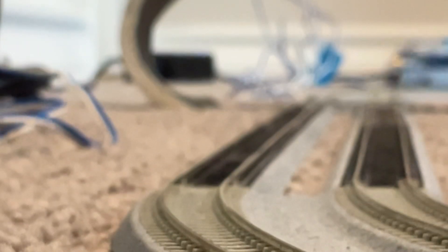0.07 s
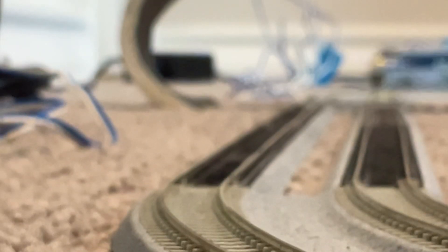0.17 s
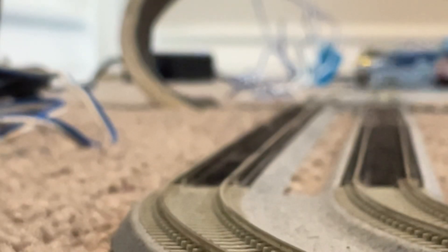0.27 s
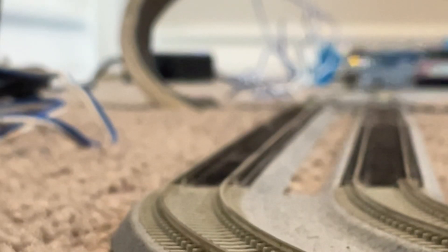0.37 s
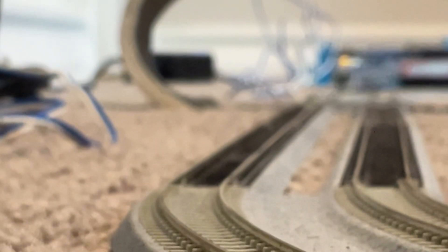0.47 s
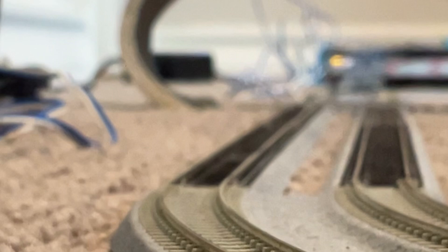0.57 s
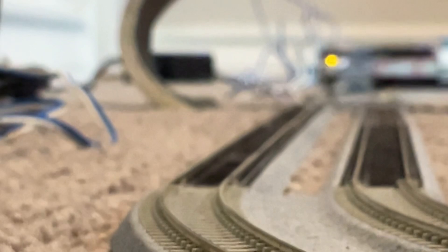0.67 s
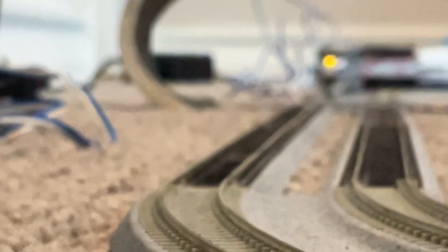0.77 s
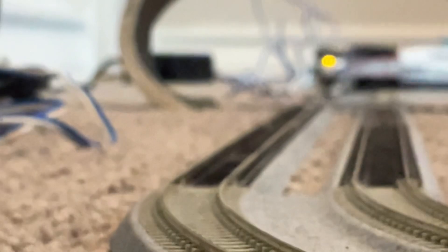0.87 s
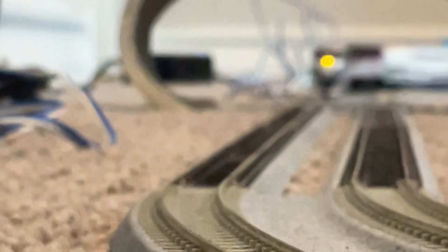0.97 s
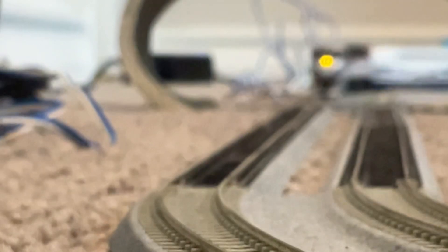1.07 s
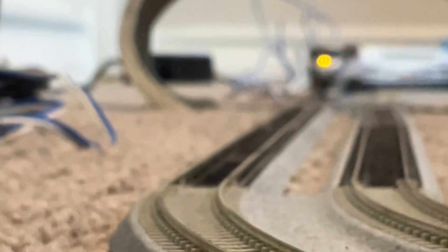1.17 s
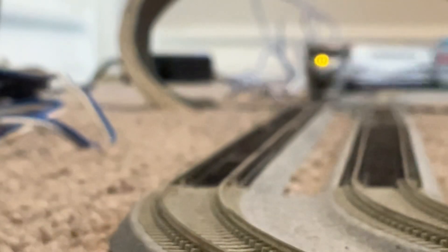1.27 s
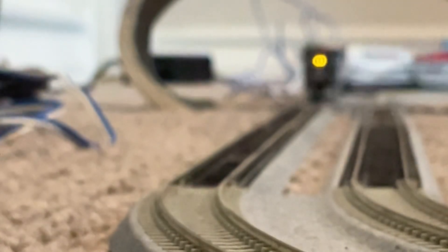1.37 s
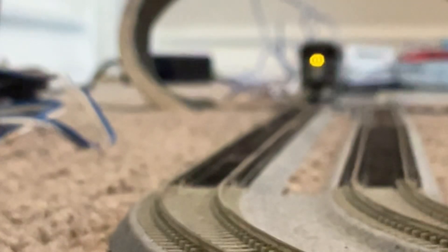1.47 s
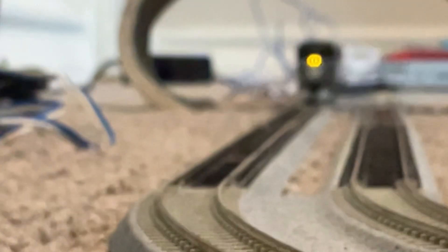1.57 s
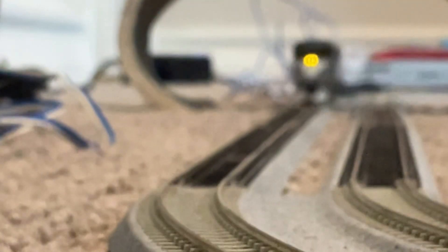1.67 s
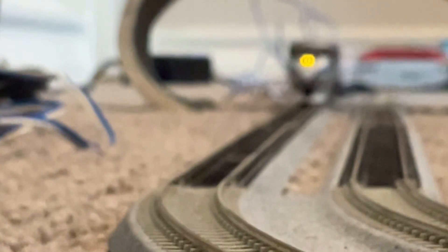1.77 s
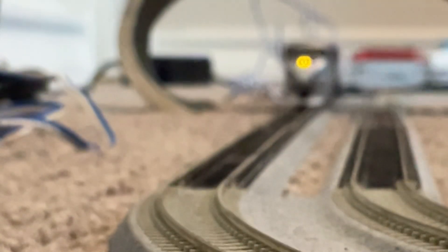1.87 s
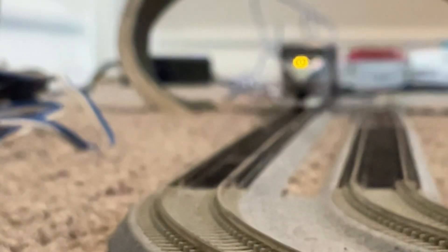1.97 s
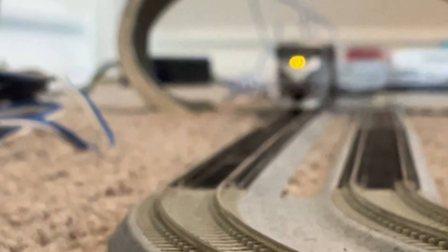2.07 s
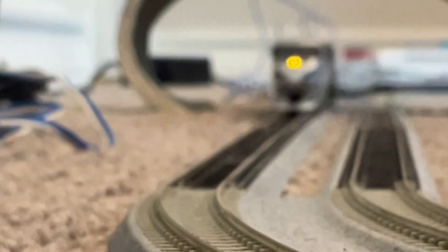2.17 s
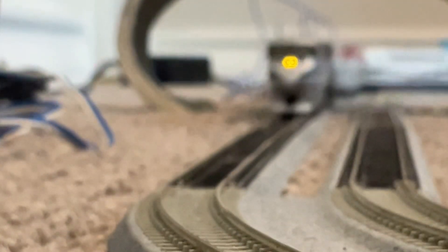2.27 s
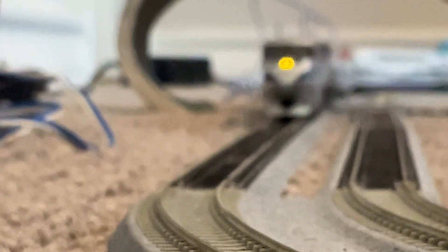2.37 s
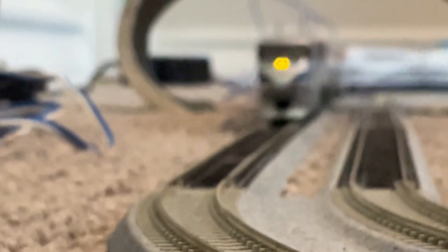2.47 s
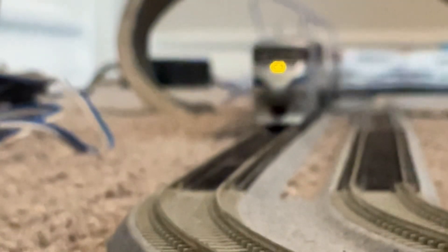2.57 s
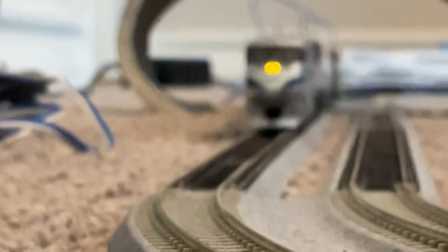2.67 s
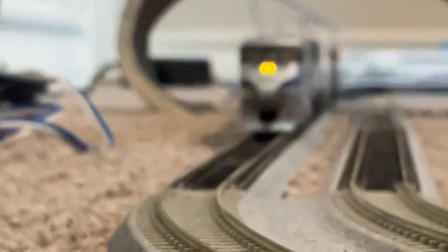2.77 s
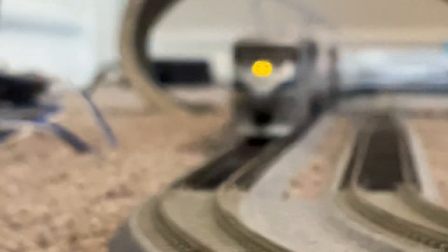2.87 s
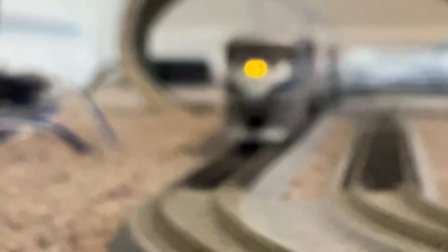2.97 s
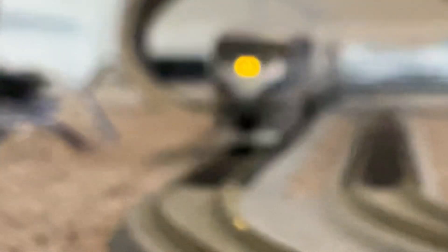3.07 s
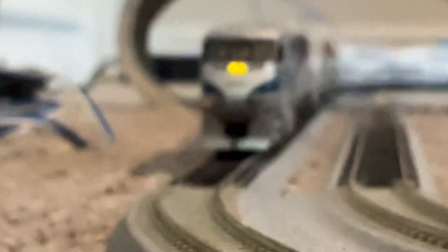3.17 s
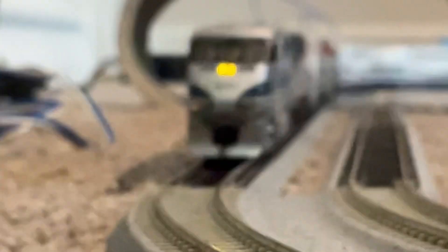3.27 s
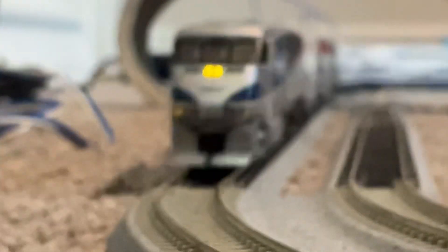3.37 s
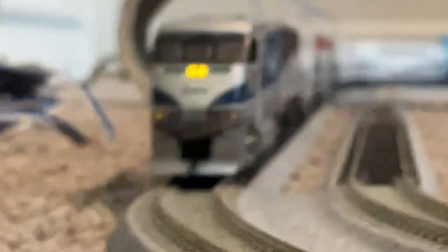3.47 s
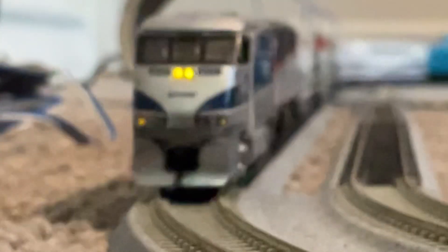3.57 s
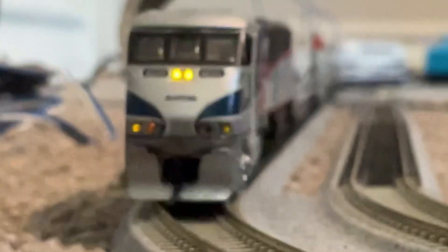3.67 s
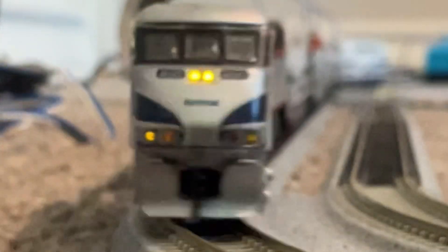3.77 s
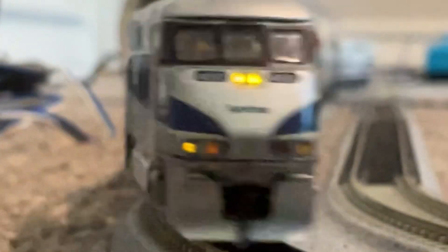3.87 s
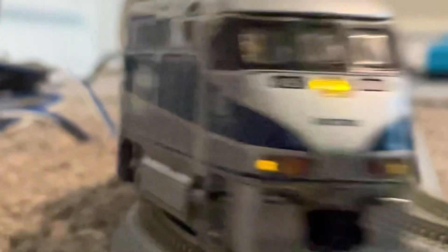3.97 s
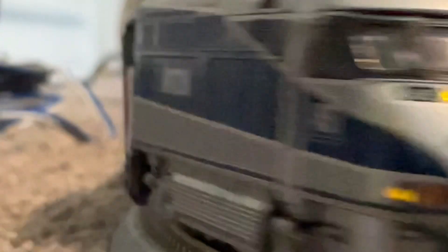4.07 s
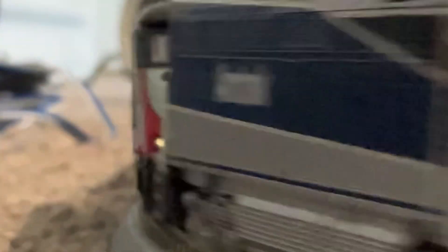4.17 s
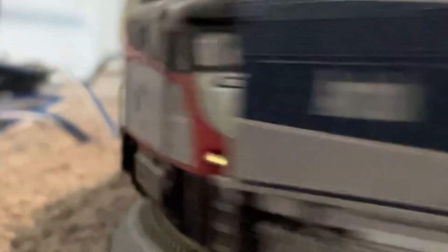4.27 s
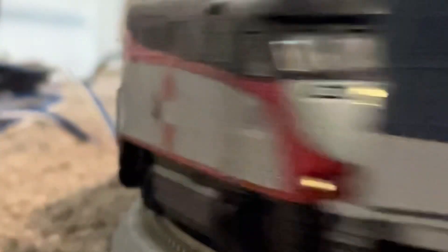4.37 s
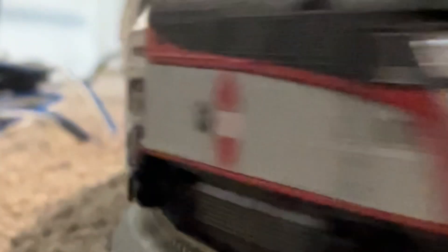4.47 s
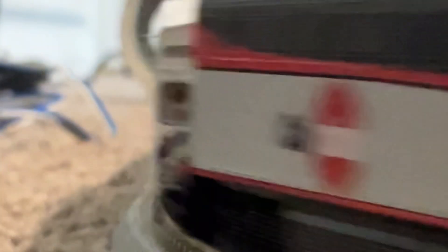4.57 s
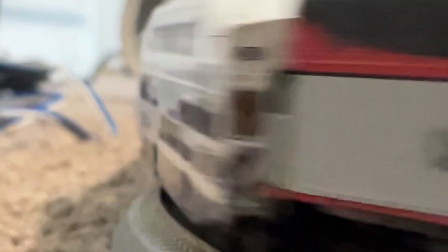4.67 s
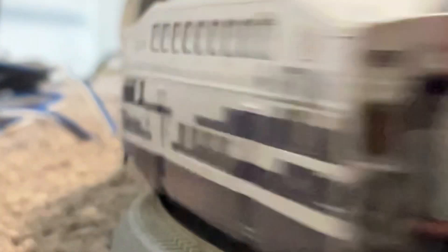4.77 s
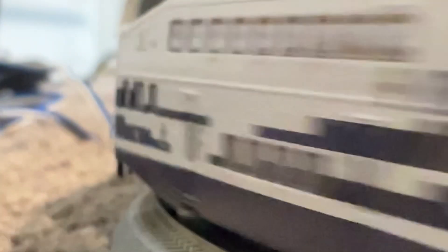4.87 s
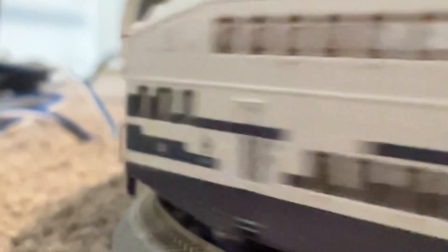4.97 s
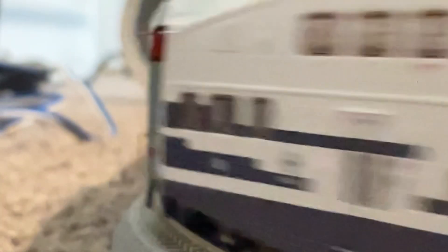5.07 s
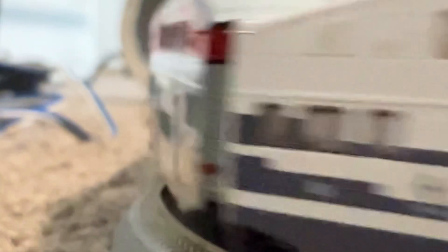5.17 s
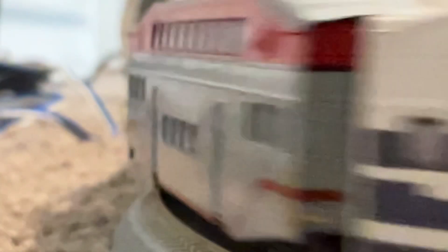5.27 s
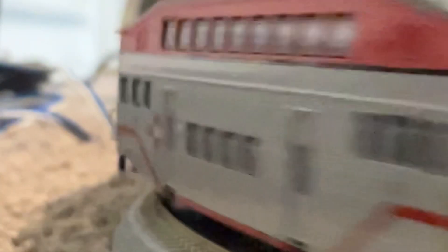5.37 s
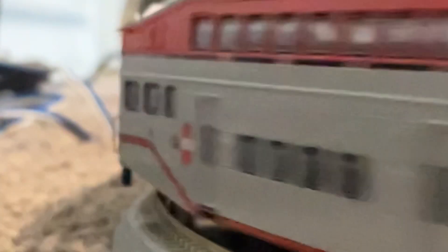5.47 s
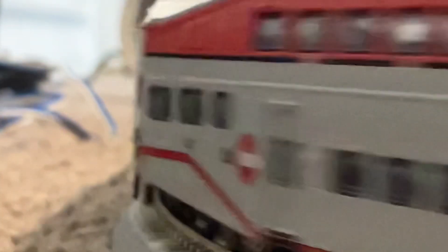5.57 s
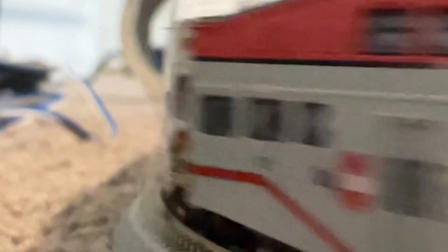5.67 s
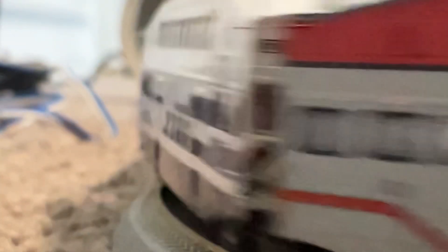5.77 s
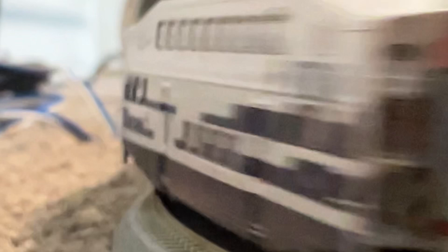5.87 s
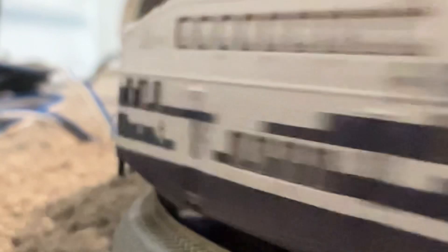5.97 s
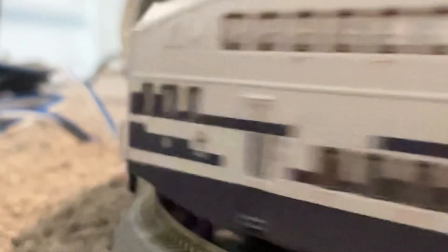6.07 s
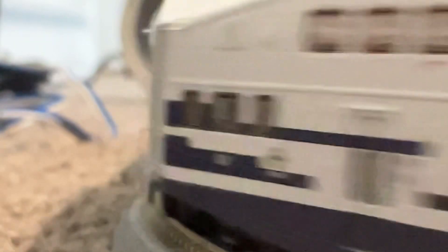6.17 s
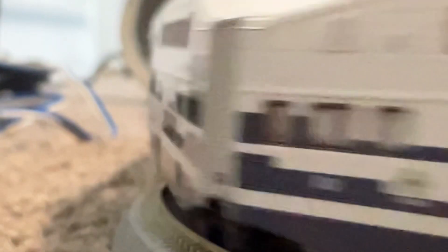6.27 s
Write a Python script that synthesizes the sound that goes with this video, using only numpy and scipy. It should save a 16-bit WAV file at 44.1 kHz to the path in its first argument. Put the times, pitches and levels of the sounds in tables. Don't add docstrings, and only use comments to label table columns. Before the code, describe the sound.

On a carpeted room floor, a miniature electric train hums and hisses quietly in the distance, its axles knocking lightly over rail joints. It comes closer, rattles, then two locomotives sweep right past a phone microphone with a gritty roar, motor whine and coupler clanks. Coaches follow, rolling steadily and slightly quieter.

```python
import sys
import numpy as np
from scipy import signal
from scipy.fft import rfft, irfft, next_fast_len
from scipy.io import wavfile
from scipy.ndimage import uniform_filter1d, map_coordinates

SR = 44100
rng = np.random.default_rng(int(sys.argv[2]) if len(sys.argv) > 2 else 0)


def wav_record(signal):
    frames = np.transpose(np.atleast_2d(signal))
    bounded = np.clip(frames, -1, 1)
    quanta = np.round(bounded * 32767).astype(np.int16)
    wavfile.write(sys.argv[1], SR, quanta)


def volts(x):
    e = np.asarray(x, float) / 20
    return 10 ** e


N = 278712
TIME_S = np.arange(N) / SR

# start_s, pitch_hz
COMMUTATOR = [(0, 226.2), (.95, 226.2), (1.2, 229.1), (2.2, 227.9), (2.75, 226.4), (4.95, 227.1),
              (5.35, 223.5), (6.32, 225)]
LEAD_S, SECOND_S = 4.27, 4.497
COACHES_S = 4.7


def unit(x):
    return x / np.sqrt(np.mean(x ** 2) + 1e-20)


def along(points, hz):
    f, v = np.transpose(points)
    return np.interp(np.log(hz + 1), np.log(f + 1), v)


def curves(rows):
    s, *columns = np.transpose(rows)
    return [np.interp(TIME_S, s, column) for column in columns]


def wobble(rate):
    knots = rng.standard_normal(int(N * rate / SR) + 4)
    return map_coordinates(knots, [np.arange(N) * rate / SR])


def filtered(x, response):
    m = next_fast_len(N + SR // 2)
    return irfft(rfft(x, m) * response(np.fft.rfftfreq(m, 1 / SR)), m)[..., :N]


def past(s):
    turn_s = 0.19
    return (1 + np.tanh((TIME_S - s) / turn_s)) / 2


def heard(far_db, lead_db, second_db, coaches_db, reach_s):
    alongside = past(COACHES_S)
    power = (1 - alongside) * volts(2 * far_db) + alongside * volts(2 * coaches_db)
    for s, db in (LEAD_S, lead_db), (SECOND_S, second_db):
        closeness = 1 / (1 + ((TIME_S - s) / reach_s) ** 2)
        turned_away = 1 - .9 * past(s + .3)
        power = power + volts(2 * db) * closeness * turned_away
    return 10 * np.log10(power)


def grit(grain_db, patchy_db):
    grains = rng.standard_normal((2, N)) * volts(grain_db * wobble(900))
    z = signal.stft(grains, nperseg=512)[2]
    patches = rng.standard_normal(z.shape[1:])
    patches = uniform_filter1d(uniform_filter1d(patches, 8, 0), 8, 1)
    return signal.istft(z * volts(patchy_db * unit(patches)), nperseg=512)[1][:, :N]


def blend(source, first, second, share):
    a, b = (unit(filtered(source, lambda hz: volts(along(c, hz)))) for c in (first, second))
    return (1 - share) * a + share * b


def rolling():
    # start_s, level_db, nose_at_phone (0-1)
    wheels = [(0, -50.5, .25), (.54, -50, 0.63), (.92, -51, 0.46), (1.23, -51, 0.95), (1.72, -52, 0.74),
              (2.05, -51.5, 0.64), (2.64, -51, 0.8), (3.27, -49, 0.9), (3.43, -46.5, .75),
              (3.52, -42, 0.59), (3.76, -38.5, 0.75), (4.01, -38, .45), (4.3, -34.5, .65),
              (4.4, -30.5, 0.49), (4.87, -35.5, .35), (5.16, -36.5, 0.1), (5.7, -38, 0.22),
              (6.32, -36.5, .15)]
    # pitch_hz, density_db (per Hz)
    far_rumble = [(20, -69), (36, -38), (50, -13), (68, -13), (110, -14), (150, -7.5), (230, -5), (300, 1),
                  (380, -0.5), (520, -5), (700, -12), (850, -15), (1000, -23.5)]
    near_rumble = [(20, -70), (36, -40), (50, -26), (68, -12), (110, -15), (150, -5.5), (230, -3.5),
                   (320, 1), (500, -5), (650, 0), (850, -11.5), (1000, -28.5)]
    coach_body = [(700, -21.5), (850, -13.5), (1040, -5), (1120, -7), (1220, -3.5), (1320, -0.5),
                  (1430, 0.5), (1560, 1), (1800, -3), (2030, -8), (2300, -2.5), (2600, -10), (2900, -18.5)]
    locomotive_body = [(700, -26), (850, -6.5), (1100, -5), (1220, -11), (1400, -8), (1540, 4.5),
                       (1700, -2), (1850, 0.5), (2050, 0), (2250, 0), (2600, -21), (2900, -21.5)]
    far_hiss = [(2400, -23), (2650, -6), (2900, 2.5), (3400, -2.5), (4000, -4.5), (5000, -0.5),
                (5900, -6.5), (7500, -3.5), (9000, -2.5), (9600, -24)]
    near_hiss = [(2400, -49.5), (2650, -17), (2900, 2), (3400, -3), (4000, -2), (5000, -0.5), (5900, -3),
                 (7600, 0.5), (9000, -1.5), (9600, -37)]
    far_sizzle = [(8600, -30), (9200, 2.5), (10000, 4), (11000, 2.5), (12600, 3.5), (13300, -1.5),
                  (14500, -5.5), (15500, -2), (16000, -17)]
    near_sizzle = [(8600, -39), (9200, 7), (10000, 4), (11500, 2), (12700, 0), (13400, -13.5), (14200, -17),
                   (15400, -9), (16000, -29.5)]

    hiss_db, nose = curves(wheels)
    commutator_hz, = curves(COMMUTATOR)
    sizzle_db = hiss_db + 12 * nose - 6.5
    rumble_db = heard(far_db=-51.5, lead_db=-49.5, second_db=-45, coaches_db=-47.5, reach_s=0.73)
    body_db = heard(far_db=-52, lead_db=-45.5, second_db=-35, coaches_db=-40.5, reach_s=0.2435)

    facing = 1.15 * (1 - past(COACHES_S + 0.3)) / (1 + ((TIME_S - SECOND_S) / 0.83) ** 2)
    near = np.clip((hiss_db + 47) / 8, 0, 1)
    rumble_near = np.clip((hiss_db + 41.0) / 6, 0, 1)
    shaded = uniform_filter1d(np.clip((hiss_db - sizzle_db + 2.5) / 5, 0, 1), size=SR // 3)

    rattle_db = .5 * wobble(30) + 0.35 * wobble(75)
    flutter_db = 0.49 * np.sin(2 * np.pi * np.cumsum(commutator_hz) / SR)

    rumble = blend(grit(grain_db=1.54, patchy_db=1.25), far_rumble, near_rumble, rumble_near)
    body = blend(grit(grain_db=1.37, patchy_db=0.95), coach_body, locomotive_body, np.clip(facing, 0, 1))
    hiss = blend(grit(grain_db=1.0, patchy_db=0.98), far_hiss, near_hiss, near)
    sizzle = blend(grit(grain_db=1.6, patchy_db=1.14), far_sizzle, near_sizzle, shaded)
    sizzle[1] *= volts(2.4 * wobble(10) + 2.5 - 10 * shaded - 1.8 * near)

    low = volts(rumble_db + 0.42) * rumble + volts(body_db + 2.0 + 0.36 * rattle_db) * body
    high = volts(hiss_db + 2.5) * hiss + volts(sizzle_db + 0.67) * sizzle
    return low + volts(rattle_db + flutter_db) * high


def motors():
    # multiple, level_db
    hum = [(1, -7.5), (2, -0.5), (3, -13.5), (4, -12)]
    whine = [(7, -5), (8, 2.5), (9, 0), (20, -21), (29, -11.5)]
    # multiple, level_db
    trailing = [(5, -1.5), (6, 1.5)]
    gear_mesh = [(1.415, -0.5), (2.83, -13.5)]
    # start_s, hum_dip_db, gear_dip_db, whine_dip_db, trailing_dip_db
    nodes = [(0, 0, 15, -5, -6.5), (.6, 2.5, 0, 10, -5), (.95, 0, -1, 17, 1), (1.22, 2.5, 5.5, 5, 6),
             (1.95, -2.5, 3.5, 7, 1), (2.3, 5, -3.5, 5, 13), (2.75, -2, -1, -3, 9), (3.2, -1, -2, -1.5, 14),
             (3.6, 5, 5.5, -5, 1.5), (4.95, -2, 0, -2, 1), (5.75, 1, 7, 2, 18)]

    s, *depths_db = np.transpose(nodes)
    node_s = 0.19
    dips_db = np.array(depths_db) @ np.exp(-((TIME_S - s[:, None]) / node_s) ** 2)
    levels_db = np.array([
        heard(far_db=-57.5, lead_db=-49.5, second_db=-61, coaches_db=-61, reach_s=0.6),
        heard(far_db=-52, lead_db=-48.5, second_db=-58, coaches_db=-72, reach_s=0.8),
        heard(far_db=-69, lead_db=-63, second_db=-40, coaches_db=-61, reach_s=0.107),
        heard(far_db=-61, lead_db=-58, second_db=-48, coaches_db=-51.5, reach_s=0.3)])
    hum_db, gear_db, whine_db, trailing_db = levels_db - dips_db

    commutator_hz, = curves(COMMUTATOR)
    turns = 2 * np.pi * np.cumsum(commutator_hz * (1 + 0.001496 * wobble(6))) / SR

    def order(multiple, db):
        return volts(db + 2.0 + 2.7 * wobble(11)) * np.sin(multiple * turns + 0.99 * wobble(25))

    def stack(orders):
        return sum(order(multiple, db) for multiple, db in orders)

    tones = volts(hum_db) * stack(hum) + volts(whine_db) * stack(whine)
    tones += volts(trailing_db) * stack(trailing) + volts(gear_db) * stack(gear_mesh)
    return np.array([tones, np.roll(tones, 300)])


def joints():
    # start_s, thud_db, knock_db
    axles = [(.564, -51, -36), (.613, -50, -48), (.777, -44, -54), (.812, -45, -40), (1.361, -41.5, -52),
             (1.388, -38, -36), (1.522, -61, -41), (1.807, -55, -32), (1.951, -58, -43), (2.326, -52, -53),
             (2.467, -53, -39), (2.484, -45, -53), (2.793, -50.5, -41), (3.012, -30, -38),
             (3.034, -41, -55), (3.07, -47, -34), (3.148, -46, -46), (3.277, -41.5, -53), (3.422, -36, -40),
             (3.579, -38, -52), (3.771, -48, -39), (4.295, -50, -32), (4.539, -61, -32), (4.648, -45, -35),
             (4.868, -52, -35), (4.97, -44, -42), (5.164, -42, -52), (5.496, -53, -38)]
    # start_s, level_db
    ticks = [
        (.564, -46),
        (1.388, -31.5),
        (2.467, -39),
        (3.012, -27.5),
        (3.07, -50),
    ]

    s, thud_db, knock_db = np.transpose(axles)
    tick_s, tick_db = np.transpose(ticks)
    # start_s, level_db, pitch_hz, width_hz, boost_db, left gain, right gain
    bands = [(s, thud_db, 172, 200, .5, -0.45, 1.55),
             (s, knock_db, 554, 550, 3.5, -0.81, 1.5),
             (tick_s, tick_db, 1490, 690, 5.2, 0.35, 1.1)]
    out = np.zeros((2, N))
    for start_s, db, hz, width_hz, boost_db, left, right in bands:
        blows = np.bincount(np.round(start_s * SR).astype(int), volts(db + boost_db), N)

        def spread(f):
            bounce = 1 + 0.19 * np.exp(-2j * np.pi * f * 0.00163)
            bass_cut = f ** 4 / (f ** 4 + 105 ** 4)
            band = np.exp(-((f - hz) / width_hz) ** 2)
            dispersion = np.exp(-2j * np.pi * (0.28 * np.sqrt(f) - 0.00571 * f))
            return bounce * bass_cut * band * dispersion

        out += np.array([[left], [right]]) * filtered(blows, spread) * SR / (3.0 * width_hz)
    return out


def knocks():
    # start_s, peak_db
    bumps = [(0.589, -44.5), (1.375, -51), (1.569, -61), (2.156, -54), (2.275, -48), (2.499, -55),
             (2.571, -54), (3.009, -53), (3.159, -58), (3.295, -55), (3.408, -52), (3.616, -57),
             (4.058, -53), (4.436, -58), (4.906, -51.5), (5.36, -61), (5.677, -51), (6.101, -57)]
    # start_s, peak_db, pitch_hz
    clanks = [
        (3.554, -24.5, 1670),
        (4.204, -24, 1981),
        (4.479, -22, 1990),
        (4.606, -17.5, 1970),
        (4.709, -36, 1594),
        (4.909, -24.5, 1560),
        (5.412, -22, 1347),
        (5.962, -28, 1500),
    ]
    out, t = np.zeros(N + SR), np.arange(SR // 8) / SR
    for s, db in bumps:
        thump = np.sin(2 * np.pi * 70 * t) * (1 - np.exp(-t / 0.0081))
        out[round(s * SR):][:len(t)] += volts(db + 2.5 - 60 * t / 0.18) * thump

    chatter = [(3.034 + k * .0094, -36.5, 873 * 1.05 ** k * 1.18 ** (k % 2)) for k in range(6)]
    for s, db, hz in [*chatter, *clanks]:
        pitch, phase = rng.uniform(size=2)
        second_mode = np.sin(2 * np.pi * (hz * (1.0 + .25 * pitch) * t + phase))
        ring = np.sin(2 * np.pi * hz * t) + 0.5 * second_mode
        out[round(s * SR):][:len(t)] += volts(db - 2 - 60 * t / 0.039) * ring * (1 - np.exp(-t / 0.0011))
    return out[:N] * np.array([[1], [.3]])


def pseudo_stereo(pair):
    # pitch_hz, turn (half
    phase_turn = [(700, 0), (1050, -.25), (1250, 0), (1400, .38), (1550, .16), (1900, -.32), (2240, -.7),
                  (2390, -.98), (2930, -1.03), (3270, -1.33), (3620, -1.72), (4100, -1.9), (4650, -1.78),
                  (4850, -1.55),
                  (5080, -1), (5340, -.48), (5860, -.19), (6400, -.03), (6720, -.16), (7060, -.48),
                  (7400, -.54), (8270, -.29), (8610, -.12), (8690, .995), (9090, 1.01), (9470, 1.46),
                  (9650, 1.78), (9900, 2)]
    # pitch_hz, likeness (0-1)
    alike = [(40, 0.71), (150, 0.85), (300, 0.9), (700, 0.8), (1200, 0.25), (1600, 0.66), (2200, 1),
             (2400, 1), (11500, 0.98), (12100, 0.93), (12900, 0.88), (13300, 0.89), (14700, 0.88),
             (15100, 0.66)]
    # pitch_hz, level_db
    tilt = [(200, -.3), (400, -1), (650, -4.5), (1300, -5), (1700, -4), (2200, -.5), (2400, 0)]
    # pitch_hz, share (amplitude)
    mirrored = [(1700, 0.014), (2100, 0.22), (3300, .3), (7000, .29), (9600, .27), (9900, 0)]

    def middle_and_side(hz):
        angle = np.arccos(np.clip(along(alike, hz), 0, 1)) / 2
        return np.array([np.cos(angle), np.sin(angle)])

    def left_and_right(hz):
        turn = along(phase_turn, hz)
        half = (-1j * np.pi * turn + np.log(volts(along(tilt, hz)))) / 2
        return np.exp([half, -half])

    def share(hz):
        return np.clip(along(mirrored, hz), 0, .7)

    mid, side = filtered(pair, middle_and_side)
    front = filtered(np.array([mid + side, mid - side]),
                     lambda hz: left_and_right(hz) * np.sqrt(1 - share(hz) ** 2))
    return front + filtered(pair[[1, 1]], lambda hz: np.conj(left_and_right(hz)) * share(hz))


def scene():
    return pseudo_stereo(rolling() + motors() + knocks()) + joints()


def band_limit(x):
    return signal.sosfilt(signal.butter(12, 17070, fs=SR, output="sos"), x)


def record(dry):
    top_hz = 15820
    mix = filtered(dry, lambda hz: (hz < top_hz) / (1 + (34 / (hz + 1)) ** 6))
    return band_limit(mix)


dry = scene()
out = record(dry)
wav_record(out)
```